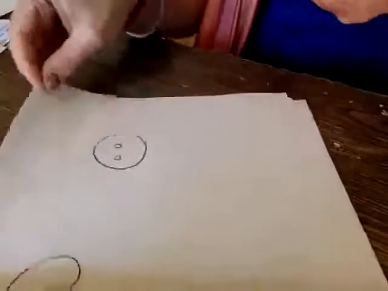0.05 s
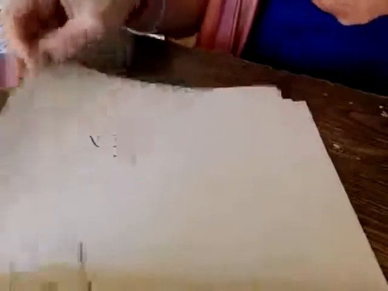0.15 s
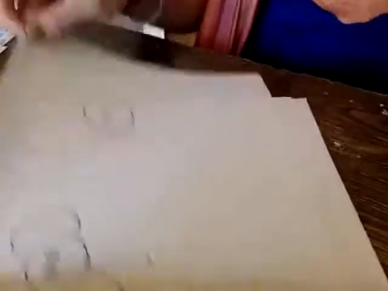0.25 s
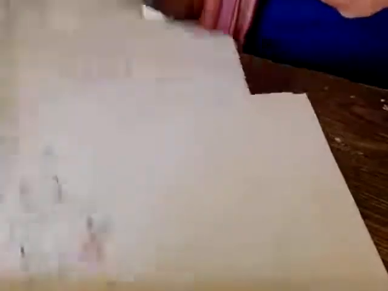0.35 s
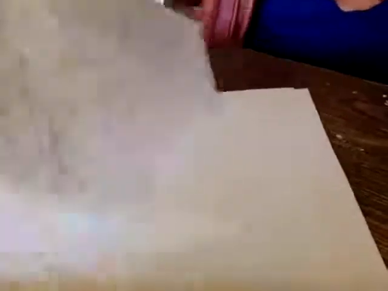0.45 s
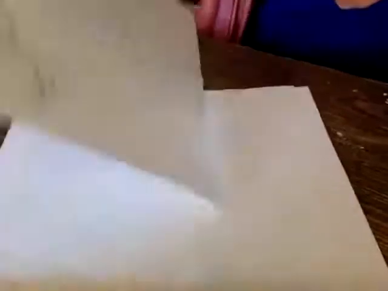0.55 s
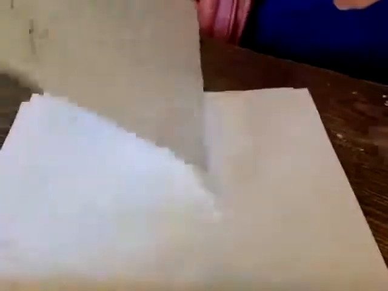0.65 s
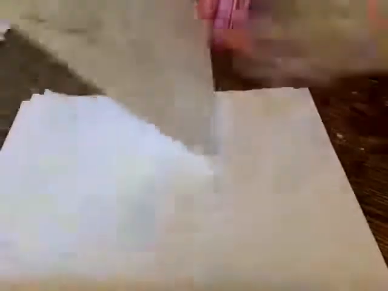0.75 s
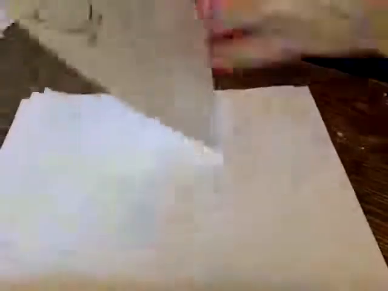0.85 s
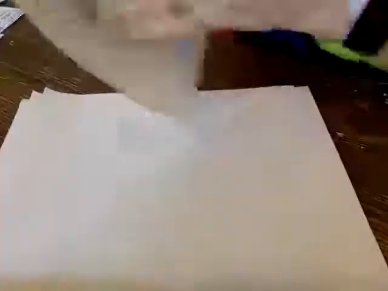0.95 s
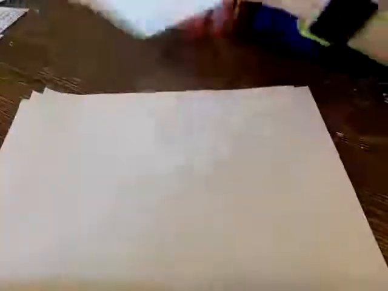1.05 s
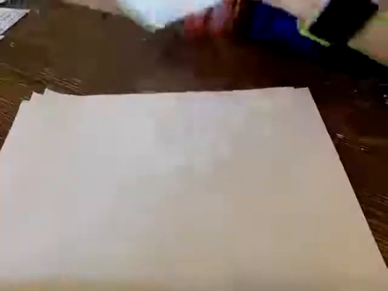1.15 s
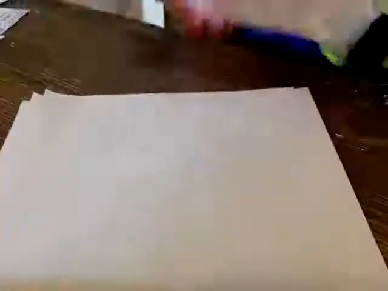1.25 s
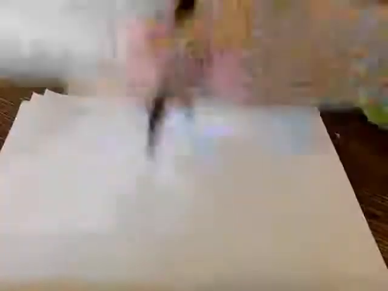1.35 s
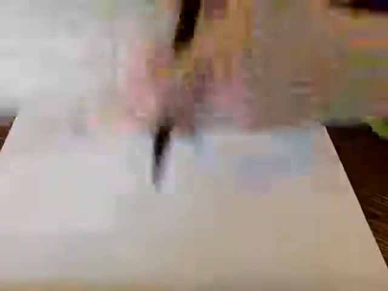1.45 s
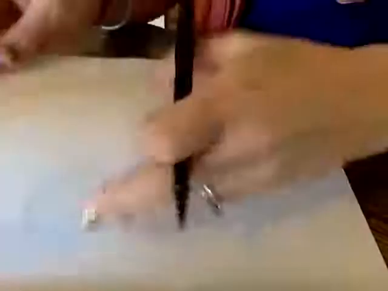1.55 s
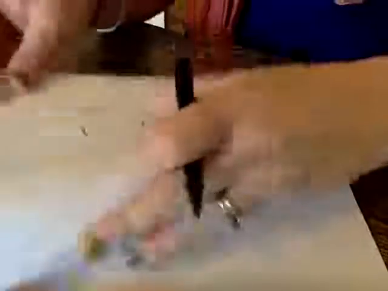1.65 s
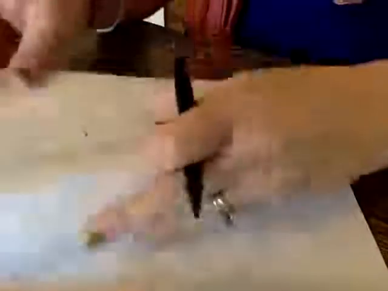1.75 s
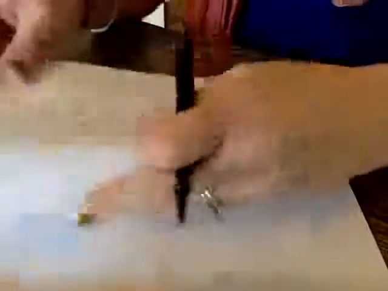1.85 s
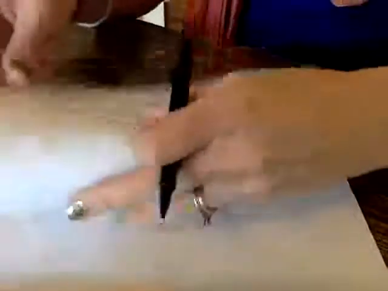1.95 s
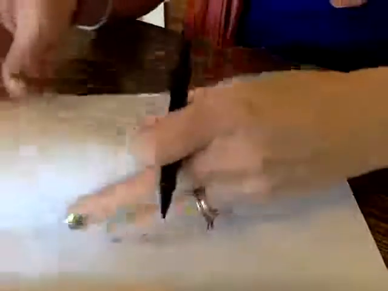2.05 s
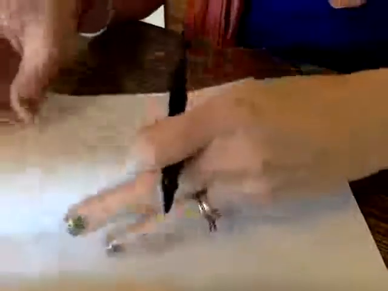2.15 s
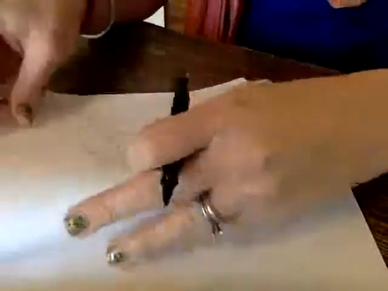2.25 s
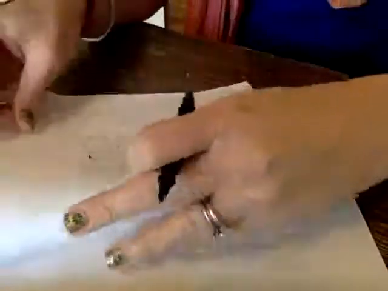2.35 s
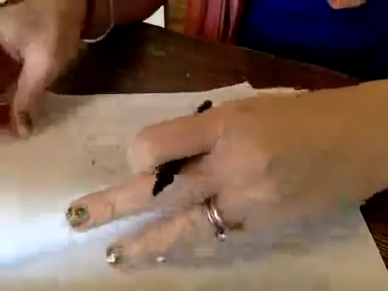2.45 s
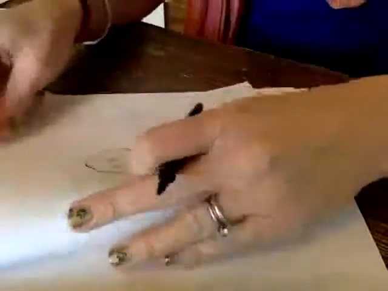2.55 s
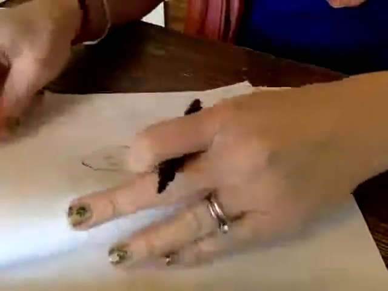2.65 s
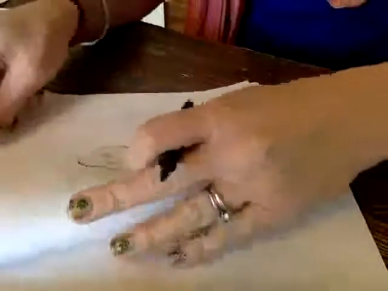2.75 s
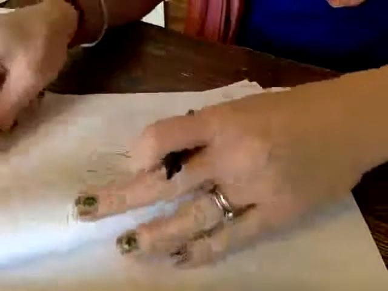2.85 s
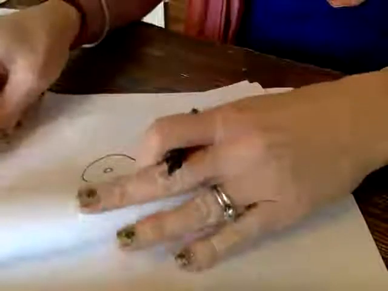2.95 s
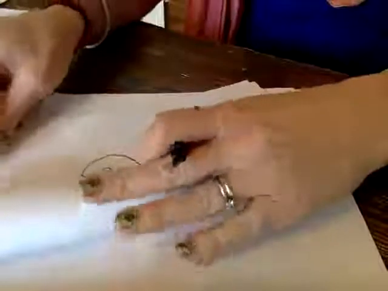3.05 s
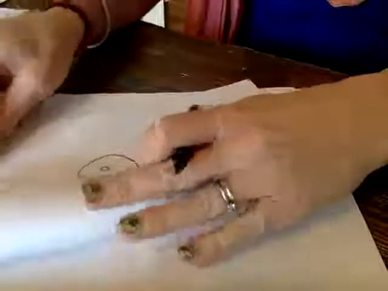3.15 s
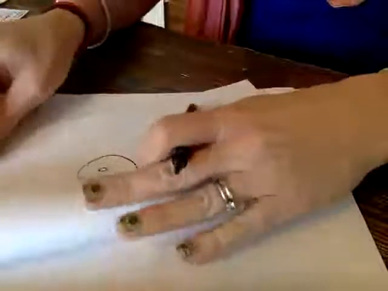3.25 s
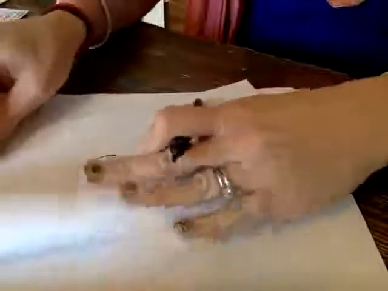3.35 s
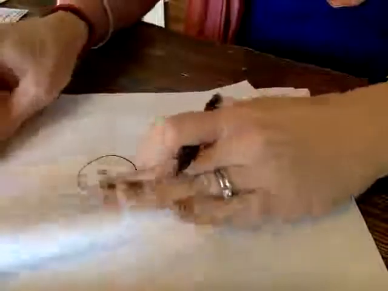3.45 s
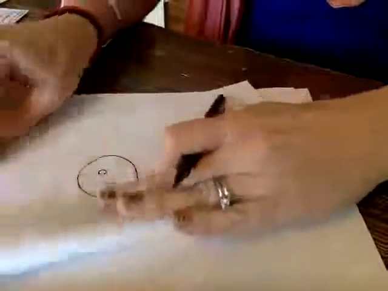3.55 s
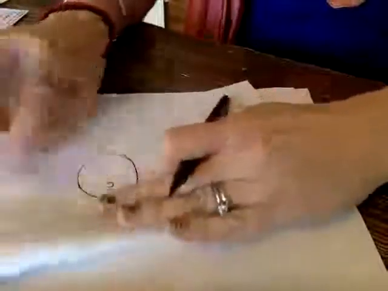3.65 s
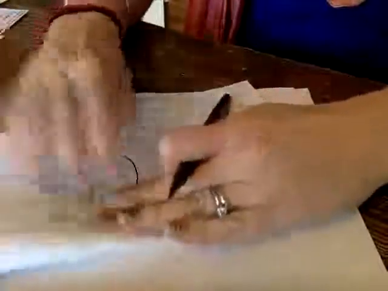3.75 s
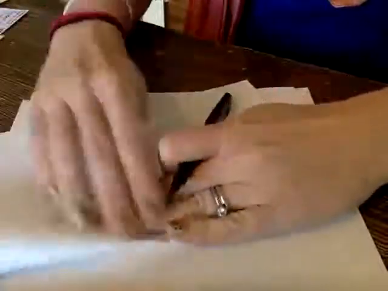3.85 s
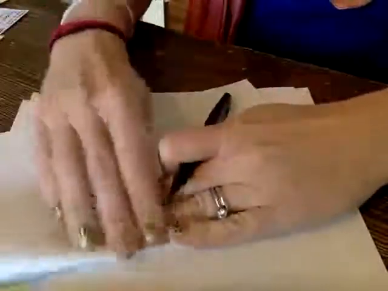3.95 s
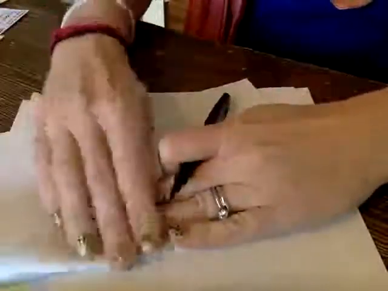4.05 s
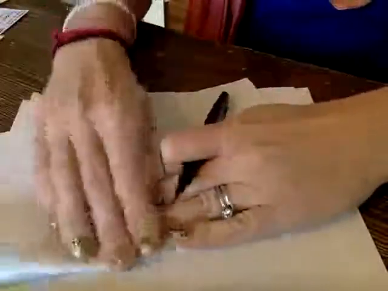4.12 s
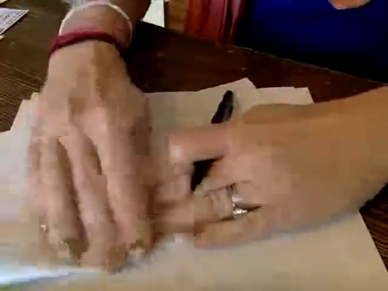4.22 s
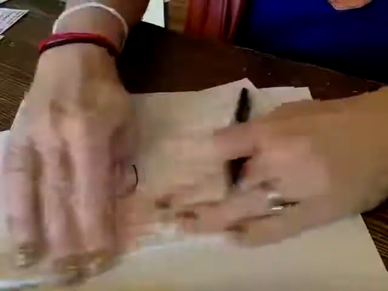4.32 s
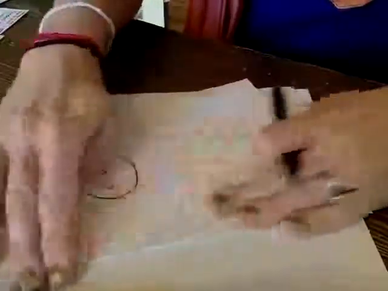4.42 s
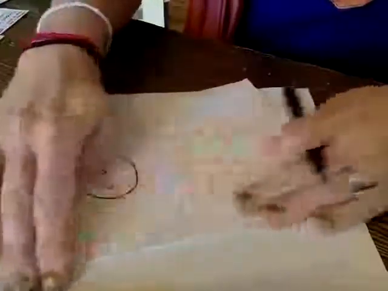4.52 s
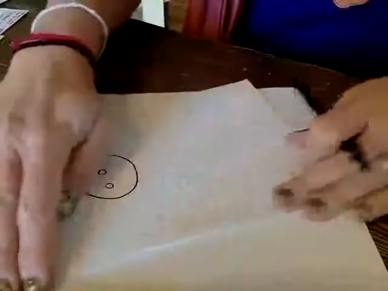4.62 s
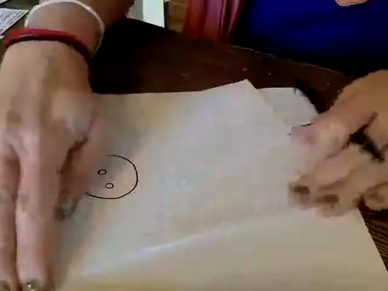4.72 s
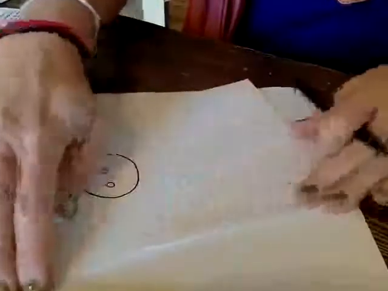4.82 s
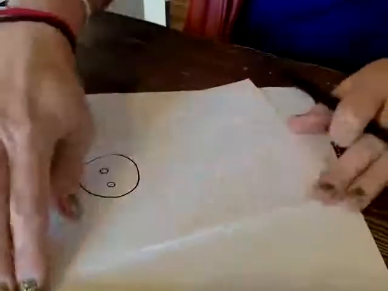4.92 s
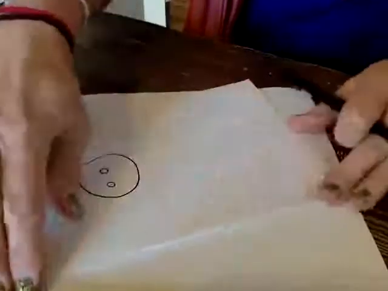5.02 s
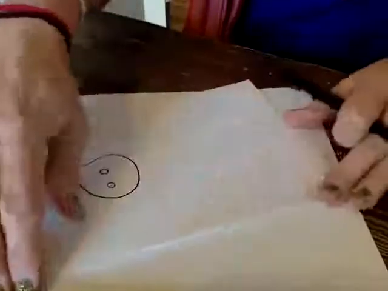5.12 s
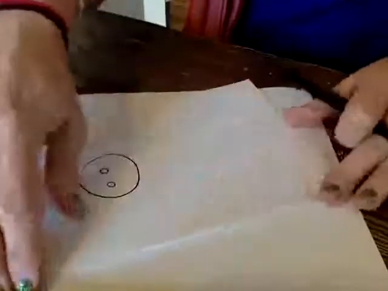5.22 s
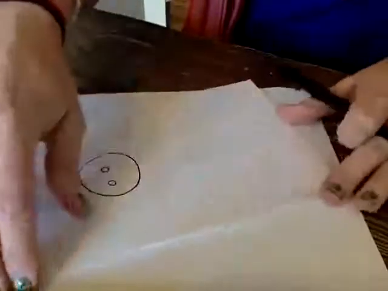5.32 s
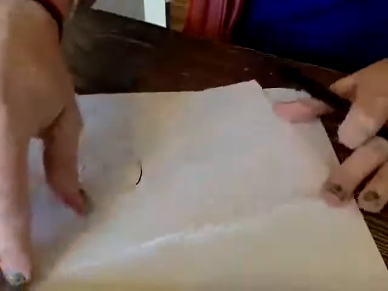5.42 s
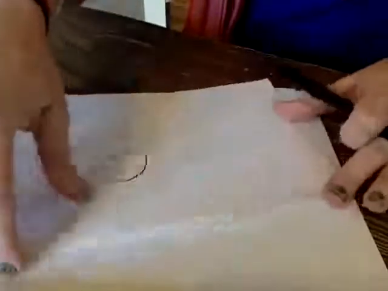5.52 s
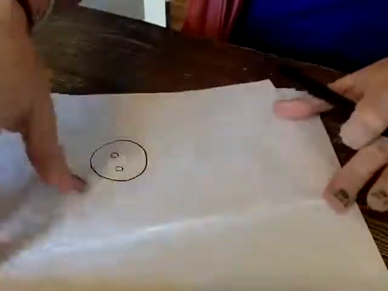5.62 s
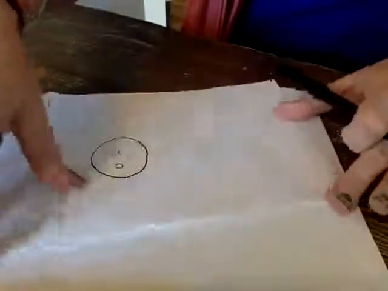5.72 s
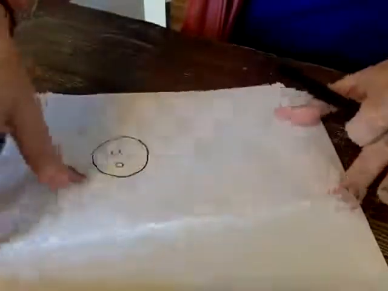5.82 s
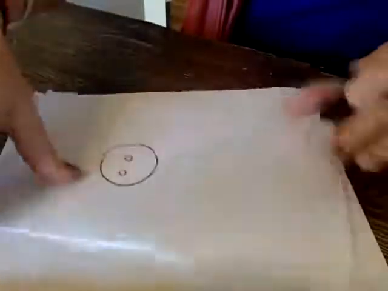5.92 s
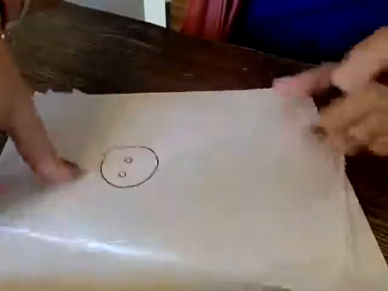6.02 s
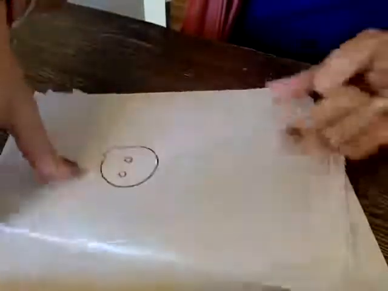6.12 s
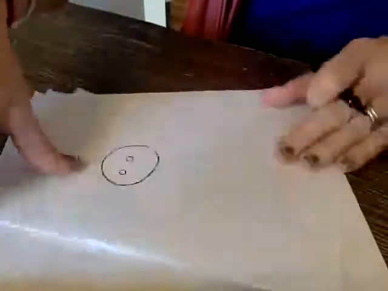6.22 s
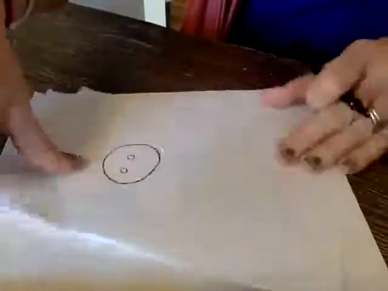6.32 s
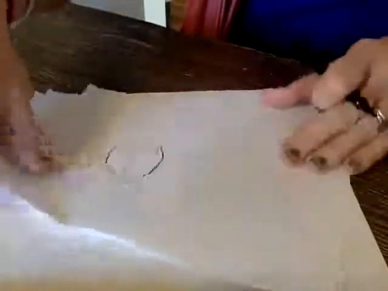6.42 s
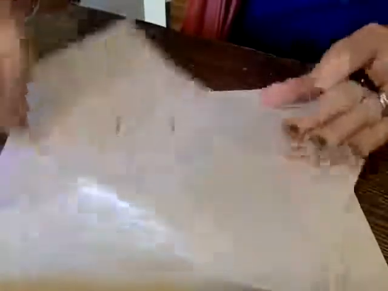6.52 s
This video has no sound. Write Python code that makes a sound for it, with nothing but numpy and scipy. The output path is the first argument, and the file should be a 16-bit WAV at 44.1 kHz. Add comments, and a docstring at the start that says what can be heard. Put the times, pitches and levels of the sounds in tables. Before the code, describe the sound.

Close, dry paper handling: brisk rustling, a sheet flapping over with loud crackles, gentle rubbing, a brief dropout, a palm swipe, then light shuffling.

```python
"""Paper sheets are lifted, turned, laid down and smoothed by hand on a wooden table in a small room.
Random clicks and noise, shaped by moving filters, make the hiss, scrape and rasp of sliding paper and its flaps.
Short noise bursts make snaps, edge ticks and crease pops; fading sine waves make finger taps and soft bumps.
Gliding chirrs, a palm swipe, a thin tone and faint room noise join in.
The sound cuts out for a quarter of a second in the middle."""
import sys
import numpy as np
from scipy import signal
from scipy.fft import rfft, irfft
from scipy.io import wavfile
from scipy.ndimage import uniform_filter1d

SR = 44100
rng = np.random.default_rng(int(sys.argv[2]) if len(sys.argv) > 2 else 0)


def to_wav(s):
    """Save 16-bit WAV."""
    ch = np.atleast_2d(s).T  # columns
    pcm = np.round(np.clip(ch, -1, 1) * 32767)  # PCM
    wavfile.write(sys.argv[1], SR, pcm.astype(np.int16))


N = 290009
TIME = np.arange(N) / SR  # seconds


def undb(db):
    """Turn decibels into a gain."""
    return 10 ** (np.asarray(db) / 20)


def unit(x):
    """Scale to an rms level of 1."""
    return x / np.sqrt(np.mean(x ** 2))


def add(out, s, x):
    """Mix x into out, starting at s seconds."""
    i = max(int(s * SR), 0)
    out[i:i + len(x)] += x[:len(out) - i]


def lowpass(x, order, edge_hz):
    """Keep what lies below the edge, as a dull material would."""
    return signal.sosfilt(signal.butter(order, edge_hz, fs=SR, output="sos"), x)


def highpass(x, edge_hz):
    """Keep what lies above the edge."""
    return signal.sosfilt(signal.butter(2, edge_hz, "highpass", fs=SR, output="sos"), x)


def band(x, lo_hz, hi_hz):
    """Keep one band, scaled so that white noise stays about equally loud."""
    hi_hz = min(hi_hz, SR * .45)
    sos = signal.butter(2, [lo_hz, hi_hz], "bandpass", fs=SR, output="sos")
    return signal.sosfilt(sos, x) * np.sqrt(SR / 2 / (hi_hz - lo_hz))


def colour(x, points):
    """Give x the tone colour drawn by the points, with no sound ahead of its cause."""
    hz, db = np.transpose(points)
    grid = np.maximum(np.fft.rfftfreq(2048, 1 / SR), 1)
    shape = np.interp(np.log(grid), np.log(hz), db)
    shape -= 24 * np.maximum(np.log2(grid / hz[-1]), 0)  # dB per octave above the last point
    shape -= 12 * np.maximum(np.log2(hz[0] / grid), 0)  # dB per octave below the first point
    # folding the cepstrum forward in time gives the minimum-phase filter
    cepstrum = irfft(np.log(undb(shape)))
    cepstrum[1:1024] *= 2
    cepstrum[1025:] = 0
    return signal.fftconvolve(x, irfft(np.exp(rfft(cepstrum))))[:len(x)]


def slips(count, per_s, spread_db):
    """Tiny clicks at random moments; a positive spread makes a few much larger than the rest."""
    chance, out = rng.random((2, count)), np.zeros(count)
    hit = chance[0] < per_s / SR
    size = undb(spread_db * np.minimum(-np.log(chance[1, hit]), 4))
    out[hit] = size * (-1.) ** np.flatnonzero(hit)
    return out


def burst(decay_s, rise_s):
    """A cluster of tiny slips, made of random signs, that swells and dies away."""
    t = TIME[:SR // 5]
    signs = rng.choice([-1, 1], len(t))
    return signs * np.exp(-t / max(decay_s, 1e-4)) * (1 - np.exp(-t / rise_s))


SAG_DB_PER_S = 14  # a movement loses speed while it lasts
BRAKE_POWER = 1.105  # above 1, the sound dies faster towards the end


def envelope(start_s, attack_s, hold_s, release_s):
    """One movement gathers speed, sags slightly, then brakes ever harder, by 20 dB within release_s."""
    t = TIME - start_s
    rise = np.sin(np.pi / 2 * np.clip(t / max(attack_s, 1e-3), 0, 1)) ** 2
    held = np.maximum(t - attack_s, 0)
    braking = np.maximum(held - hold_s, 0) / max(release_s, 1e-3)
    loss_db = SAG_DB_PER_S * held + 20 * braking ** BRAKE_POWER
    return rise * undb(-np.minimum(loss_db, 200))


def combined(shapes, levels_db):
    """Gain over time for each column of levels; overlapping movements add in power."""
    return np.sqrt(undb(levels_db).T ** 2 @ np.array(shapes) ** 2)


# tone colour of the faint background: [f/Hz, level/dB]
BACKGROUND_COLOUR = [(25, -17), (100, -1.5), (250, 7.5), (400, -1), (650, -9.5), (1500, -11), (4000, -18),
                     (8000, -23.5), (16000, -20)]


def room_tone(level_db):
    """Steady coloured noise lies faintly under everything."""
    return undb(level_db) * unit(colour(rng.standard_normal(N), BACKGROUND_COLOUR))


# resonances of table and stack: [f/Hz, width/Hz, level/dB]
STACK_RESONANCES = [(614, 22, -9.5), (890, 15, -9.5), (1560, 39, -2.5), (2080, 51, -2), (2660, 74, -14),
                    (3380, 35, -6)]


def resonate(x):
    """Table and stack ring along with the rubbing and the snaps."""
    out = x.copy()
    for hz, width_hz, db in STACK_RESONANCES:
        out += undb(db) * signal.lfilter(*signal.iirpeak(hz, hz / width_hz, fs=SR), x)
    return out


def shifting(x, depth_db, width_hz, hold_s):
    """The sheet changes shape, so blunt resonances and deep notches come and go all over the spectrum."""
    spectrum = signal.stft(x, nperseg=512)[2]
    field = rng.standard_normal(spectrum.shape)
    # smooth the random field twice, over pitch and over time
    for axis, span in enumerate((width_hz * 512 / SR, hold_s * SR / 256)):
        for _ in range(2):
            field = uniform_filter1d(field, max(int(round(span)), 1), axis=axis, mode="wrap")
    depth_db = depth_db[np.linspace(0, N - 1, spectrum.shape[1]).astype(int)]
    gain = undb(depth_db * np.minimum(unit(field), 1.2))  # the limit keeps peaks blunt
    even_gain = gain / np.sqrt(np.mean(gain ** 2, axis=0))
    return signal.istft(spectrum * even_gain)[1][:N]


BRISK_DB = -40  # around this level a slow rub turns into a brisk one
BRISK_EVENNESS = .55  # share of the patchiness that a rub loses as it gets very brisk


def friction(points, push, slips_per_s, spread_db, patchy_db, width_hz, catch_db):
    """Fibres catch and let go, at times a whole patch at once; a slow rub is patchy, a brisk one more even."""
    releases = (rng.random(N) < 70 / SR) * rng.random(N)  # about 70 patches a second
    surge = signal.lfilter([1], [1, -np.exp(-1 / (.007 * SR))], releases)  # each fades over 7 ms
    surge = np.minimum(unit(surge), 3)
    fibres = unit(slips(N, slips_per_s, spread_db)) + .6 * rng.standard_normal(N)
    drive = fibres * undb(catch_db * surge)
    depth_db = patchy_db * (1 - BRISK_EVENNESS * push / (push + undb(BRISK_DB)))
    rub = colour(shifting(drive, depth_db, width_hz, hold_s=.07), points)
    return push * unit(resonate(rub))


# tone colours of the fibres, the edge and the whole sheet: [f/Hz, level/dB]
FIBRE_COLOUR = [(5000, -15.5), (7600, -15), (9000, -1), (11000, 4.5), (13500, 6.5), (16000, 5.5)]
EDGE_COLOUR = [(2800, -32), (4200, 1), (5000, 1.5), (6400, -1.5), (7500, -11), (10000, -25.5)]
SHEET_COLOUR = [(500, -38.5), (900, -34), (1150, -26.5), (1450, -15.5), (1750, -8.5), (2200, -3),
                (2800, 3.5), (3400, 1.5), (4100, -2), (5500, -19.5)]


def sliding(glide, drag):
    """Paper dragged over paper: fine hiss of the fibres, scrape of the edge, rasp of the whole sheet."""
    edge = undb(-5.5) * glide ** 0.68 * drag ** 0.35  # the edge scrapes with both speed and pressure
    hiss = friction(FIBRE_COLOUR, glide, slips_per_s=6000, spread_db=1.5,
                    patchy_db=4, width_hz=350, catch_db=1.1)
    scrape = friction(EDGE_COLOUR, edge, slips_per_s=6000, spread_db=0,
                      patchy_db=6.5, width_hz=250, catch_db=1.2)
    rasp = friction(SHEET_COLOUR, drag, slips_per_s=3500, spread_db=1.6,
                    patchy_db=7.5, width_hz=190, catch_db=0.84)
    return hiss + scrape + rasp


FLAP_ATTACK_S, FLAP_HOLD_S = 0.0095, 0.023
# tone colours of the bending sheet and of the pushed air: [f/Hz, level/dB]
FLAP_COLOUR = [(100, -30.5), (250, -17.5), (450, -9.5), (680, -4.5), (880, 4.5), (1060, 5.5), (1330, -6.5),
               (1550, -7), (2000, -4), (3500, -23)]
AIR_COLOUR = [(25, -21), (60, -23.5), (90, -14.5), (130, -1.5), (180, -9), (280, 4.5), (420, -2.5),
              (800, -13.5)]
# the sheet swings over: [t/s, flap level/dB, air level/dB, release/s]
SWINGS = [(0.539, -52, -52.5, 0.2), (0.859, -30, -54, 0.21), (1.046, -43.5, -47.5, 0.053),
          (1.068, -35.5, -52.5, 0.15), (1.183, -47, -55, 0.22), (1.53, -32.5, -54.5, 0.12),
          (1.571, -35.5, -36.5, 0.064), (1.70, -28, -39, 0.15), (1.803, -36, -51.5, 0.055),
          (5.654, -48, -62.5, 0.14), (5.88, -62, -55, 0.11), (6.263, -65, -56, 0.076),
          (6.432, -46, -68, 0.078)]


def bending(flutter):
    """The sheet flutters as it slides, flaps as it swings over and pushes a soft gust ahead of it."""
    swings = [envelope(s, FLAP_ATTACK_S, FLAP_HOLD_S, release_s) for s, _, _, release_s in SWINGS]
    bend, gust = combined(swings, np.array(SWINGS)[:, 1:3])
    flap = friction(FLAP_COLOUR, np.hypot(bend, flutter), slips_per_s=690, spread_db=2.0,
                    patchy_db=6.5, width_hz=110, catch_db=1.0)
    air = friction(AIR_COLOUR, gust, slips_per_s=380, spread_db=3.5,
                   patchy_db=7, width_hz=90, catch_db=-4.5)
    return flap + air


# the hand slides a sheet:
# [t/s, attack/s, hold/s, release/s, hiss level/dB, rasp level/dB, flutter level/dB]
HAND_STROKES = [ (0.02, 0.048, 0.083, 0.051, -36, -38, -69),
                (0.173, 0.0097, 0.0084, 0.091, -37.5, -41, -66),
                (0.233, 0.056, 0.022, 0.054, -36.5, -43.5, -60),
                (0.297, 0.03, 0.14, 0.085, -34.5, -36.5, -47.5),
                (0.5, 0.0086, 0.014, 0.038, -73, -35.5, -48), (0.566, .02, 0.039, 0.31, -57, -51.5, -64.5),
                (0.749, 0.027, 0.049, 0.021, -48.5, -56, -63),
                (0.855, 0.0045, 0.015, 0.11, -63, -32.5, -40),
                (0.901, 0.0079, 0.0079, 0.022, -43.5, -53.5, -46.5),
                (0.933, 0.042, 0.24, 0.25, -65, -47, -66.5), (1.074, 0.06, 0.02, 0.03, -44.5, -38, -44.5),
                (1.25, 0.031, 0.006, 0.071, -52, -45, -67.5), (1.302, 0.034, 0.17, 0.12, -62, -51.5, -51),
                (1.349, 0.036, 0.01, 0.041, -29.5, -32, -35.5),
                (1.506, 0.06, 0.22, 0.022, -32, -35.5, -35.5), (1.641, .006, .11, .012, -33, -43.5, -59.5),
                (1.808, 0.012, 0.14, 0.25, -28.5, -31.5, -47.5),
                (2.076, 0.014, 0.03, 0.046, -28, -31.5, -46.5),
                (2.112, 0.032, 0.031, 0.069, -43.5, -43, -43),
                (2.212, 0.032, 0.022, 0.077, -49.5, -39.5, -44),
                (2.286, 0.016, 0.023, 0.11, -42.5, -39, -51.5),
                (2.384, 0.013, 0.13, 0.078, -49, -45.5, -53.5),
                (2.562, .055, 0.056, 0.078, -52.5, -47, -57),
                (2.672, 0.049, 0.081, 0.054, -41.5, -46, -55.5),
                (2.789, 0.077, 0.071, 0.12, -61, -50.5, -57.5),
                (2.999, 0.095, 0.068, 0.14, -71, -54.5, -71),
                (3.194, 0.0053, 0.031, 0.19, -66.5, -49, -63.5), (3.396, 0.049, 0.043, .1, -73.5, -55, -86),
                (3.439, 0.081, 0.047, 0.11, -48.5, -60, -63.5), (3.762, 0.025, 0.065, 0.1, -55, -58, -57.5),
                (3.997, 0.051, 0.014, 0.038, -51, -46, -58), (4.138, 0.0034, 0.0043, 0.07, -55, -70, -70),
                (4.228, 0.024, 0.036, 0.06, -46, -41.5, -81),
                (4.242, 0.088, 0.31, 0.125, -28.5, -37, -66.5),
                (5.279, 0.004, 0.012, 0.05, -52.5, -53.5, -87.5),
                (5.325, 0.035, 0.012, 0.025, -63, -60, -63.5), (5.437, 0.06, 0.16, .1, -42, -44.5, -70),
                (5.628, 0.016, 0.02, 0.094, -32, -32, -55.5),
                (5.737, 0.029, 0.039, 0.031, -51.5, -43.5, -69),
                (5.859, 0.054, 0.013, 0.043, -42, -46.5, -58),
                (5.928, 0.046, 0.026, 0.07, -30, -40.5, -57.5),
                (6.028, 0.019, 0.011, 0.033, -38, -44, -59.5),
                (6.075, 0.024, 0.0087, 0.031, -59.5, -50, -55),
                (6.231, .008, 0.012, 0.05, -58, -72.5, -70.5),
                (6.292, 0.05, 0.022, 0.082, -56, -62.5, -56.5),
                (6.424, 0.065, 0.025, 0.19, -34.5, -37.5, -61.5)]


def strokes():
    """Each stroke of the hand makes the sheet hiss, rasp and flutter under one envelope."""
    rows = np.array(HAND_STROKES)
    movements = [envelope(*timing) for timing in rows[:, :4]]
    glide, drag, flutter = combined(movements, rows[:, 4:])
    return sliding(glide, drag) + bending(flutter)


CHIRR_WIDTH = 0.054  # half-width of a chirr as a share of its starting pitch
# skin and paper stick and slip with a gliding chirr; levels are before the shared gain:
# [t/s, level/dB, start f/Hz, end f/Hz, length/s]
STICK_SLIPS = [(0.029, -54.5, 2100, 1653, 0.12), (0.06, -45.5, 2550, 2720, 0.13),
               (0.067, -43, 4900, 4900, 0.12), (0.439, -43.5, 3100, 1340, 0.051),
               (1.512, -45, 5220, 5220, 0.034), (1.828, -41, 2850, 2658, 0.4),
               (2.05, -42.5, 3050, 3310, 0.19), (2.363, -48, 3380, 3190, 0.2),
               (2.652, -44.5, 3500, 3250, 0.19), (3.508, -55, 5400, 5250, 0.063),
               (3.76, -54.5, 5400, 4660, 0.14), (4.22, -55, 2500, 2770, 0.052),
               (4.199, -58.5, 1380, 1566, 0.6), (5.28, -61, 3500, 4000, .11),
               (5.33, -59, 2020, 1917, 0.068), (5.63, -51.5, 1330, 1200, 0.13),
               (6.228, -68, 4150, 4020, 0.069), (6.239, -61.5, 1200, 1290, 0.18),
               (6.305, -59, 2050, 2600, 0.092), (6.424, -47, 4100, 4120, 0.05)]


def chirrs(level_db):
    """Rapid stick-slip at an unsteady, gliding rate swells and dies."""
    out = np.zeros(N)
    for s, db, start_hz, end_hz, length_s in STICK_SLIPS:
        hz = np.linspace(start_hz, end_hz, int(length_s * SR))
        unsteady = lowpass(rng.standard_normal((2, SR)), 2, start_hz * CHIRR_WIDTH)[:, :len(hz)]
        spin = np.exp(2j * np.pi * np.cumsum(hz) / SR)
        grain = np.real((unsteady[0] + 1j * unsteady[1]) * spin)
        add(out, s, undb(db + level_db) * unit(grain) * np.hanning(len(hz)))
    return out


# edges and corners flick; levels are before the shared gain:
# [t/s, crisp level/dB, bright level/dB, decay/s]
EDGE_FLICKS = [(0.0377, -37, -63, 0.0045), (0.324, -29.5, -27, 0.005), (0.508, -32, -35.5, 0.012),
               (0.859, -27, -67, 0.0019), (1.361, -34, -33, 0.0056), (1.825, -18.5, -19, 0.012),
               (2.077, -32, -27.5, 0.0068), (2.093, -41, -26.5, 0.004), (3.2019, -58, -53, 0.0021),
               (5.952, -39, -32.5, 0.017), (6.0494, -33, -28, 0.0024), (6.063, -35, -36, 0.0013)]


def ticks(level_db):
    """A corner slips off another sheet: a crisp flick with a bright fizz of fibres."""
    out = np.zeros(N)
    for s, crisp_db, bright_db, decay_s in EDGE_FLICKS:
        flick = burst(decay_s, rise_s=.0001)
        flick *= np.sqrt(0.0075 / max(decay_s, 5e-4))  # a quicker flick has a higher peak
        crisp = undb(crisp_db) * band(flick, 1900, 5800)
        fizz = undb(bright_db) * band(flick, 7500, 16000)
        add(out, s, crisp + fizz)
    return undb(level_db) * out


POP_DECAY_S, POP_SPREAD = 0.00061, 1.42  # spread: ratio of the band edges to the centre
# single creases give way; levels are peaks before the shared gain: [t/s, level/dB, f/Hz]
CREASES = [(0.322, -21, 6000), (0.717, -22, 7000), (1.044, -27, 2970), (1.160, -25, 2980),
           (1.7111, -13, 1800), (1.724, -16.5, 2200), (1.7374, -17.5, 2602), (1.758, -16, 3530),
           (3.9294, -25, 3970), (5.2838, -29, 6040), (5.361, -44, 3216), (6.0507, -19, 4950),
           (6.1027, -34, 3490), (6.458, -27.5, 3800)]


def pops(level_db):
    """One crease gives way with a lone click."""
    out = np.zeros(N)
    spread = max(POP_SPREAD, 1.1)
    for s, db, hz in CREASES:
        click = band(burst(POP_DECAY_S, rise_s=.0001), hz / spread, hz * spread)
        add(out, s, undb(db + level_db) * click / np.abs(click).max())
    return out


CRACKLES_PER_S = 1500
BOUNCE_S, BOUNCE_DB = (.0004, .0016), -9.5  # the table mirrors each snap after a lag within this range
# tone colour of the buckling sheet: [f/Hz, level/dB]
BUCKLE_COLOUR = [(50, -38.5), (150, -28.5), (400, -11), (700, 0), (950, 5), (1280, -6), (1550, 1),
                 (1900, -6), (2800, 0), (5000, -6), (16000, -11.5)]
# the sheet buckles; levels are before the shared gain and filters, the shiver's relative to the crack:
# [t/s, level/dB, bright edge f/Hz, decay/s, shiver level/dB, shiver decay/s]
BUCKLES = [(0.524, -29, 2130, 0.011, -21.5, .007), (0.5573, -27, 3386, 0.0052, -17.5, .007),
           (0.566, -24.5, 1415, 0.013, -18.5, .01), (0.7046, -13.5, 5010, 0.0023, -24, .015),
           (0.8208, -12, 4370, 0.0016, -16.5, .035), (0.8558, -5, 5400, 0.0028, -19.5, .04),
           (1.067, -29.5, 1400, 0.0044, 4, 0.022), (1.083, -19, 2300, 0.0037, -5.5, 0.034),
           (1.090, -19, 1480, .0021, -30, .03), (1.196, -28.5, 1786, 0.0034, 3.5, .03),
           (1.208, -25.5, 1598, .006, -4.5, 0.03), (1.539, -11, 2174, 0.0044, -20, 0.017),
           (1.554, -15, 3074, 0.0049, -16, .02), (1.5939, -13, 2700, 0.0082, -18, .02),
           (1.644, -20.5, 2200, 0.0053, -7.5, 0.014), (1.7, -4.5, 3400, 0.0047, -14, 0.038),
           (1.729, -18, 3050, 0.003, -6.5, .015), (1.827, -21, 5210, .003, -6, 0.016),
           (6.4437, -18.5, 4930, 0.0021, -24, 0.027)]


def snaps(level_db, shiver_edge_share):
    """A bulge flips through with a crack and the sheet shivers on in a duller crackle."""
    out = np.zeros(N)
    for s, db, edge_hz, decay_s, shiver_db, shiver_s in BUCKLES:
        crack = burst(decay_s, rise_s=0.0016)
        crackle = unit(unit(slips(len(crack), CRACKLES_PER_S, spread_db=-2.5)) + .7)
        shiver = burst(shiver_s, rise_s=0.002) * crackle
        dull_crack = lowpass(crack, 5, min(edge_hz, SR / 3))
        dull_shiver = lowpass(shiver, 5, min(edge_hz * shiver_edge_share, SR / 3))
        snap = undb(db + level_db) * (dull_crack + undb(shiver_db) * dull_shiver)
        add(out, s, snap)
        add(out, s + rng.uniform(*BOUNCE_S), undb(BOUNCE_DB) * snap)
    return resonate(colour(out, BUCKLE_COLOUR))


# hand and pile touch the table; levels are before the shared gain and shaping:
# [t/s, level/dB, f/Hz, decay/s]
SOFT_CONTACTS = [(0.595, -31, 123, 0.0084), (0.672, -36, 104.2, 0.0065), (0.7051, -23.5, 190, 0.0026),
                 (1.747, -31.5, 157.4, 0.018), (3.92, -26.5, 310, 0.0031), (4.674, -40.5, 505.6, 0.0039),
                 (5.672, -39.5, 102.4, 0.019), (5.697, -38.5, 113, 0.021), (5.877, -37.5, 310, 0.013),
                 (5.903, -31, 320, 0.0069), (6.286, -42, 120.7, 0.014), (6.309, -40, 378, .005)]


def bumps(level_db):
    """A soft contact gives a few low, damped swings."""
    out, t = np.zeros(N), TIME[:SR // 4]
    for s, db, hz, decay_s in SOFT_CONTACTS:
        fade = np.exp(-t / decay_s) * (1 - np.exp(-t / 0.00076))
        add(out, s, undb(db + level_db) * np.sin(2 * np.pi * hz * t) * fade)
    return highpass(out, 65)


# ringing of the pile on the table top: [f/Hz, level/dB, time to fall 60 dB/s]
TABLE_RINGING = [(636, -11.5, 0.068), (866, -4, 0.085), (934, 20, 0.014), (1120, -3.5, 0.059)]
# fingertips land on the pile; levels are peaks before the shared gain: [t/s, level/dB]
FINGER_TAPS = [(1.318, -29.5), (2.239, -26), (2.859, -36), (3.532, -38.5), (4.007, -35.5), (4.024, -34.5),
               (4.139, -32), (4.67, -51), (6.444, -30)]


def taps(level_db):
    """Fingertips knock the pile against the wood; each spot weights the ringing tones differently."""
    out, t = np.zeros(N), TIME[:SR // 8]
    for s, db in FINGER_TAPS:
        ring = np.zeros(len(t))
        for hz, mode_db, t60 in TABLE_RINGING:
            fade = undb(mode_db + 2 * rng.standard_normal() - 60 * t / t60)
            ring += fade * np.sin(2 * np.pi * hz * t)
        ring *= 1 - np.exp(-t / 0.005)
        add(out, s, undb(db + level_db) * ring / np.abs(ring).max())
    return out


# faint thin tones: [t/s, level/dB, f/Hz, hold/s, release/s]
FAINT_TONES = [(3.367, -52, 1713, .45, .14)]


def thin_tones(waver_share):
    """A faint narrow tone swells and fades, wavering slightly in pitch."""
    out = np.zeros(N)
    for s, db, hz, hold_s, release_s in FAINT_TONES:
        waver = unit(uniform_filter1d(rng.standard_normal(N), size=500))
        swell = envelope(s, .09, hold_s, release_s)
        phase = 2 * np.pi * np.cumsum(hz * (1 + waver_share * waver)) / SR
        out += undb(db) * swell * np.sin(phase)
    return out


# tone colour of the palm on paper: [f/Hz, level/dB]
PALM_COLOUR = [(60, -25), (150, -15), (500, -4.5), (1100, 7), (3000, 9.5), (5200, 8.5), (7000, -11.5),
               (16000, -9)]


def swipe(start_s, landing_db, brush_db):
    """The palm lands on the top sheet, brushes across it and lifts off."""
    landing = envelope(start_s, attack_s=0.0093, hold_s=0.0025, release_s=0.026)
    brush = envelope(start_s, attack_s=0.0064, hold_s=0.054, release_s=0.0028)
    rub = unit(colour(rng.standard_normal(N), PALM_COLOUR))
    return rub * (undb(landing_db) * landing + undb(brush_db) * brush)


def room(x, wet_db, t60_s, treble_t60_s):
    """Nearby walls return a short tail whose treble dies first."""
    t = TIME[:SR // 2]
    low = lowpass(rng.standard_normal(len(t)), 2, 3500)
    high = highpass(rng.standard_normal(len(t)), 3500)
    low *= np.exp(-np.log(1000) * t / t60_s)
    high *= np.exp(-np.log(1000) * t / treble_t60_s)
    tail = (low + 2.0 * high) * (t > .005)  # the walls answer after 5 ms
    return x + undb(wet_db) * signal.fftconvolve(x, tail / np.linalg.norm(tail))[:N]


def scene():
    """Short hits with the room's tail, rubbing without it, and a faint background."""
    rubbing = strokes() + chirrs(level_db=5.5) + thin_tones(waver_share=0.004)
    rubbing += swipe(start_s=3.919, landing_db=-32.0, brush_db=-37.0)
    hits = ticks(level_db=-1.0) + pops(level_db=.5) + snaps(level_db=9.5, shiver_edge_share=0.77)
    hits += bumps(level_db=-5.0) + taps(level_db=-1.5)
    echoing = room(hits, wet_db=-15.5, t60_s=0.33, treble_t60_s=0.13)
    return (echoing + rubbing + room_tone(level_db=-78))[None]


TOP_HZ = 15900  # nearly nothing is left above this
# the silent gap: [start t/s, end t/s]
SILENCE = (3.557, 3.8)


def record(dry):
    """The sound cuts out briefly, and a steep filter removes the highest treble."""
    live = 1. * ((TIME < SILENCE[0]) | (TIME > SILENCE[1]))
    live = uniform_filter1d(live, size=60)  # softens both edges of the gap
    return signal.sosfilt(signal.ellip(10, .2, 75, TOP_HZ, fs=SR, output="sos"), dry * live)


dry = scene()
out = record(dry)
to_wav(out)
```